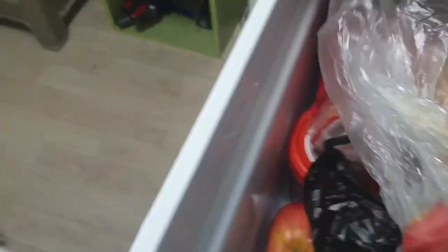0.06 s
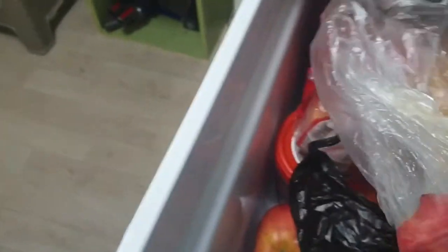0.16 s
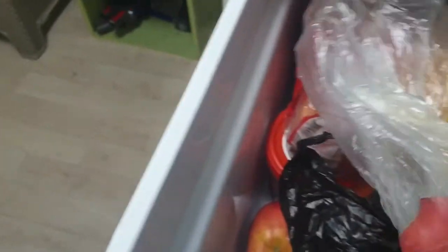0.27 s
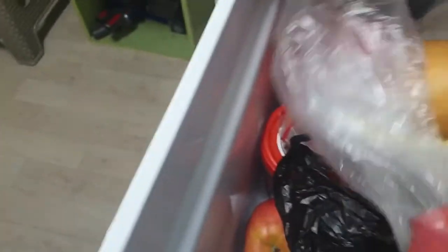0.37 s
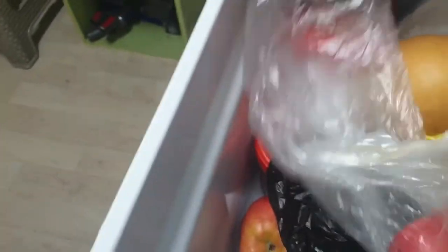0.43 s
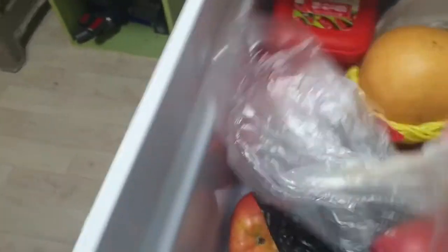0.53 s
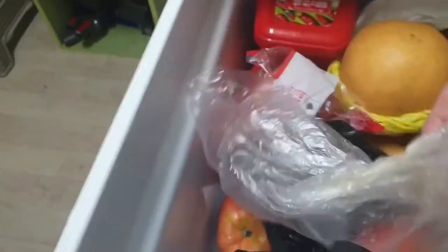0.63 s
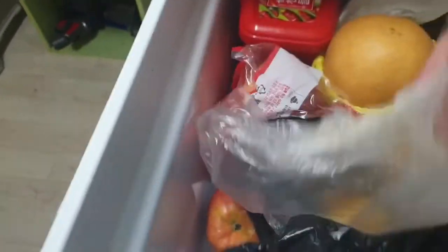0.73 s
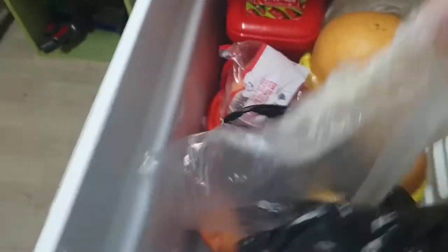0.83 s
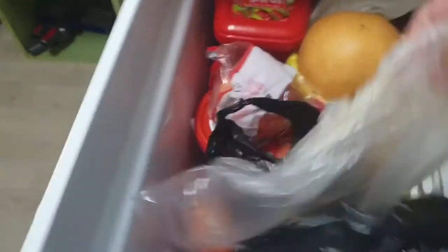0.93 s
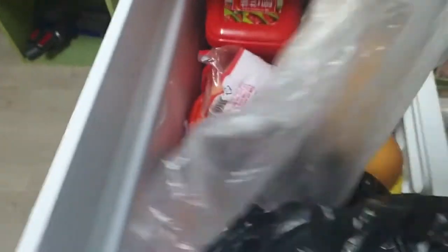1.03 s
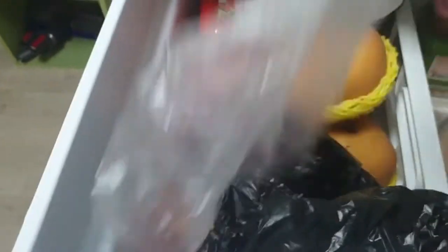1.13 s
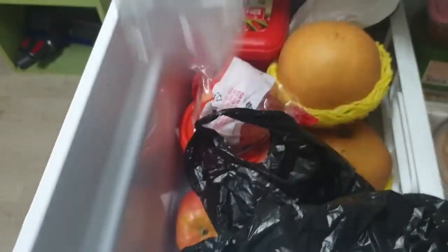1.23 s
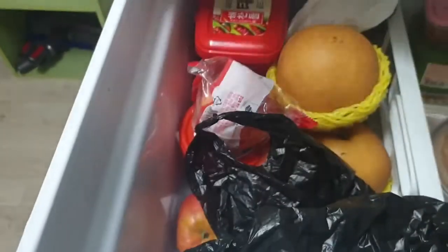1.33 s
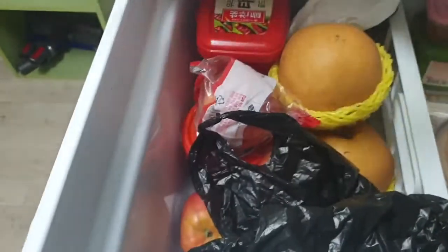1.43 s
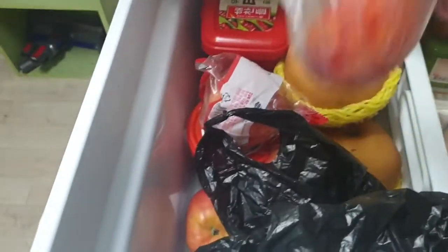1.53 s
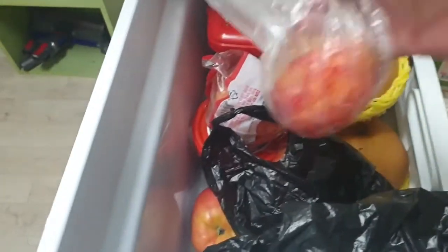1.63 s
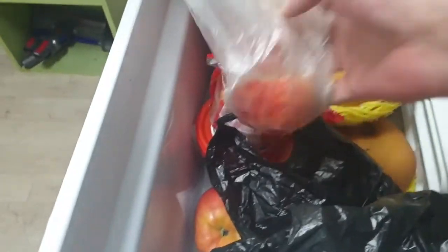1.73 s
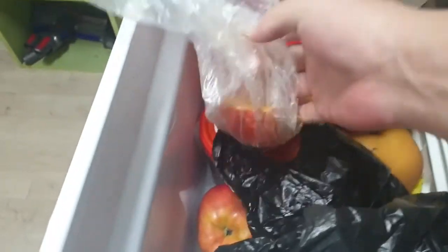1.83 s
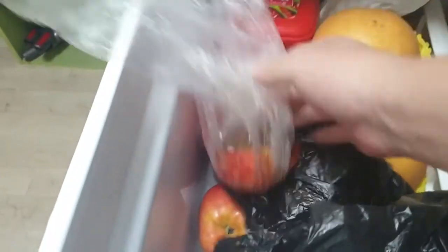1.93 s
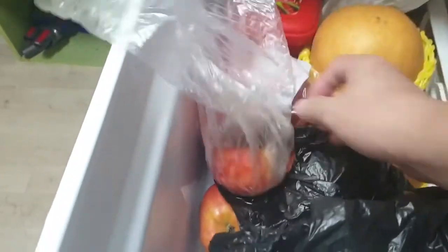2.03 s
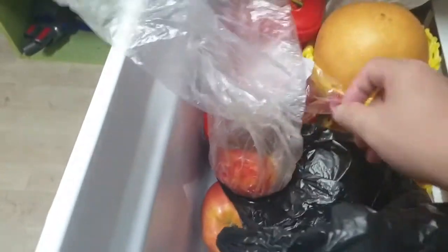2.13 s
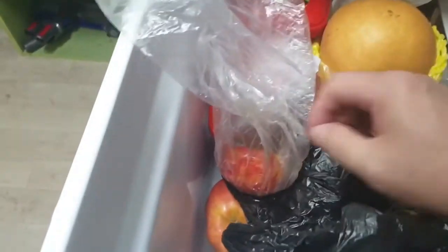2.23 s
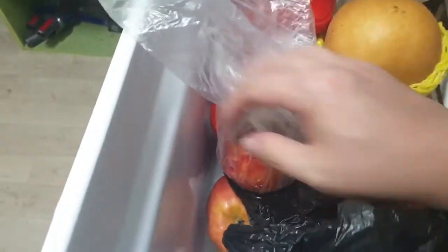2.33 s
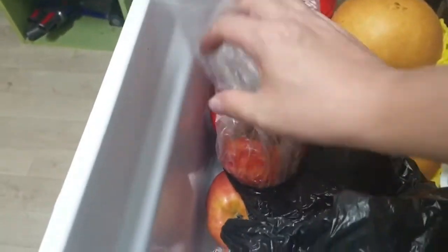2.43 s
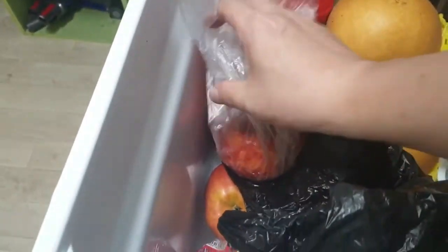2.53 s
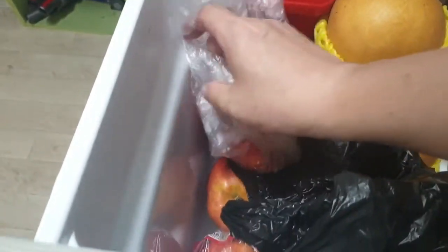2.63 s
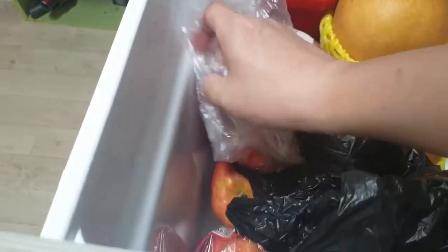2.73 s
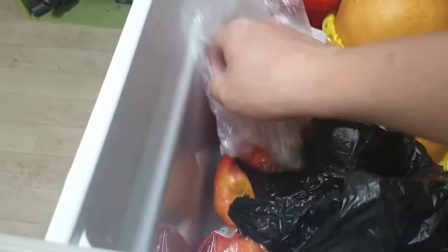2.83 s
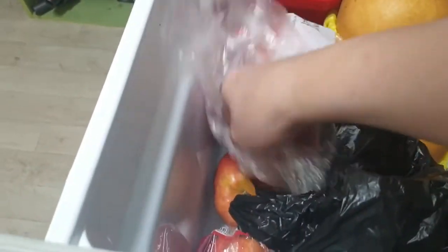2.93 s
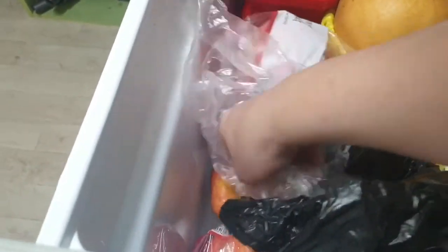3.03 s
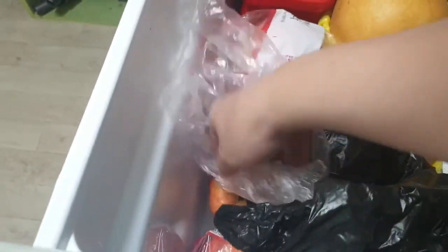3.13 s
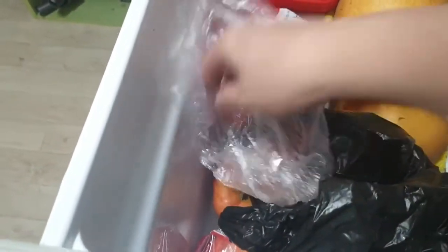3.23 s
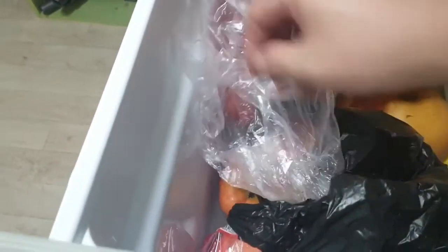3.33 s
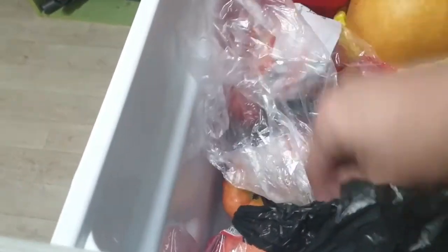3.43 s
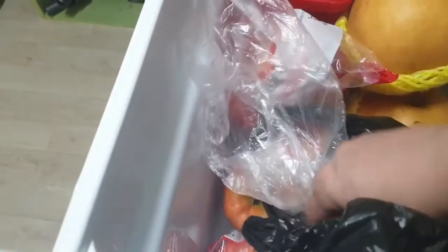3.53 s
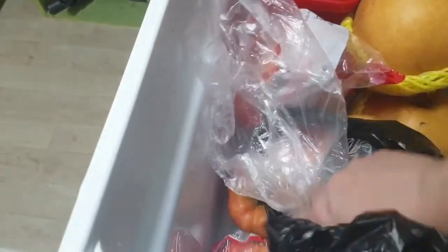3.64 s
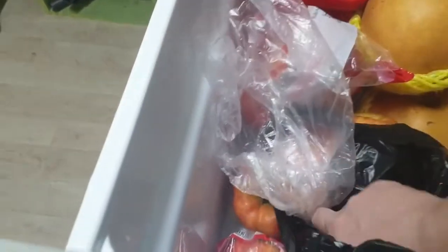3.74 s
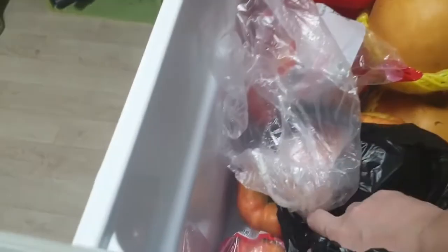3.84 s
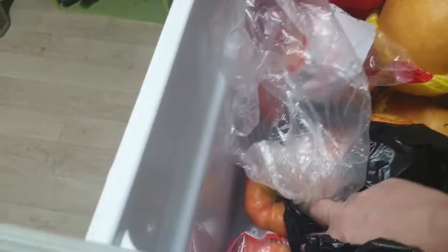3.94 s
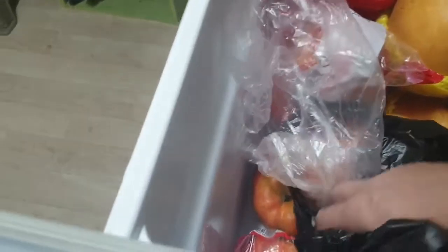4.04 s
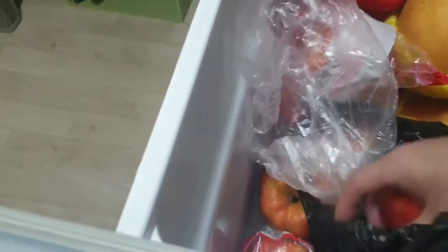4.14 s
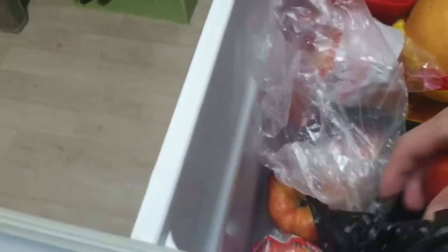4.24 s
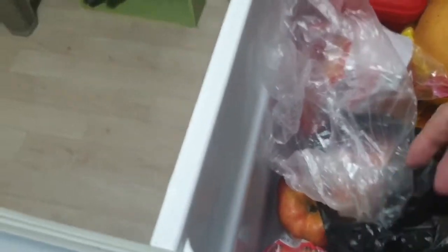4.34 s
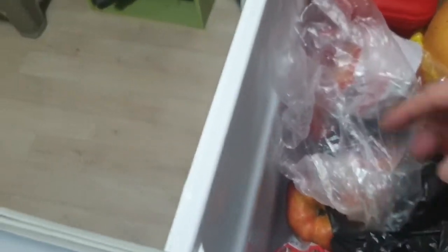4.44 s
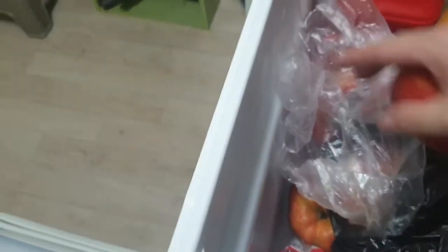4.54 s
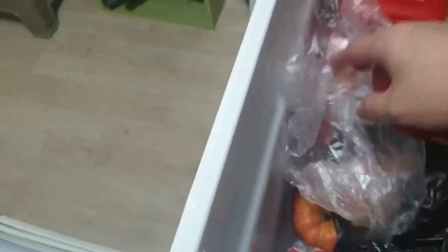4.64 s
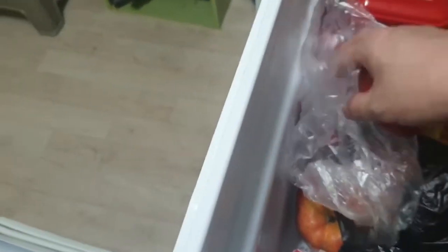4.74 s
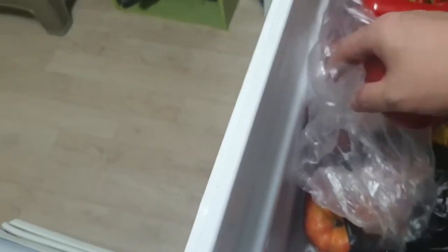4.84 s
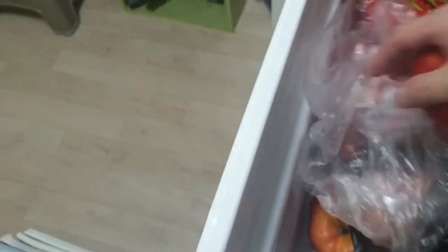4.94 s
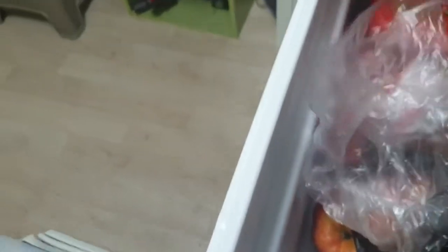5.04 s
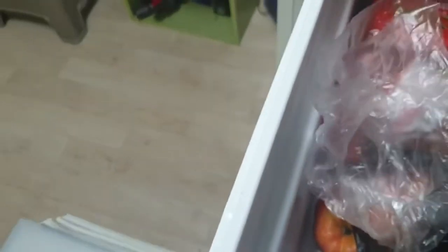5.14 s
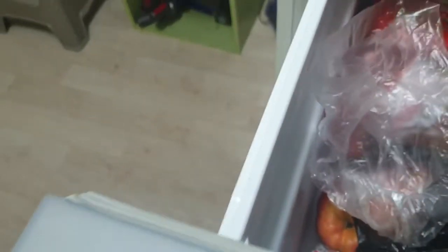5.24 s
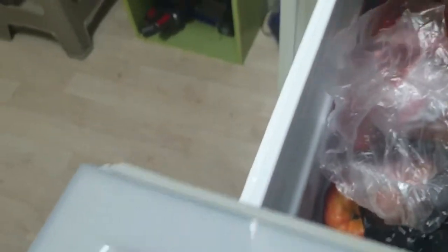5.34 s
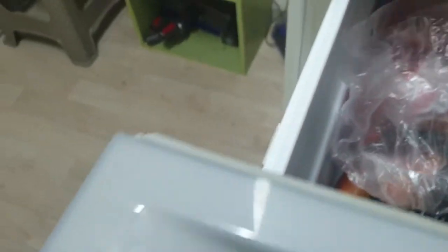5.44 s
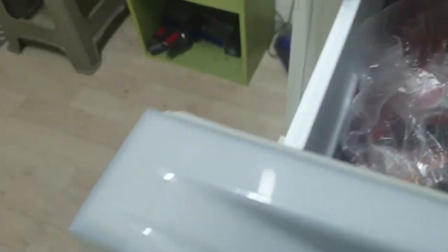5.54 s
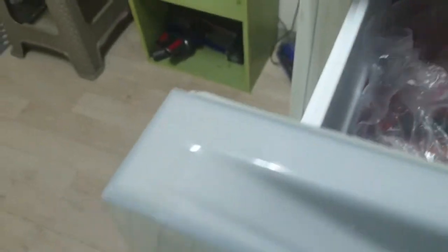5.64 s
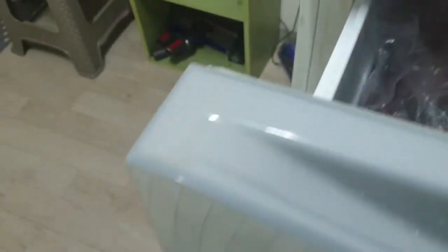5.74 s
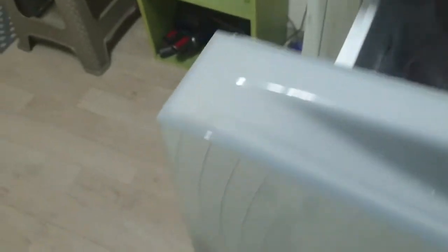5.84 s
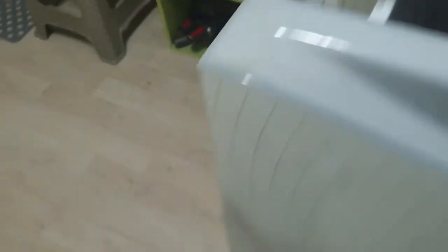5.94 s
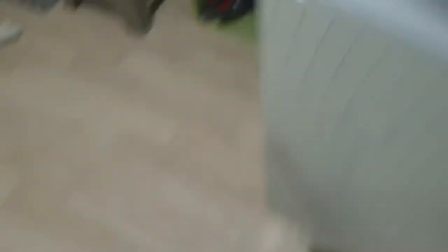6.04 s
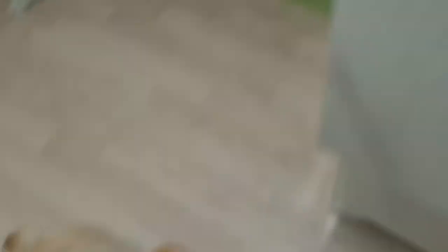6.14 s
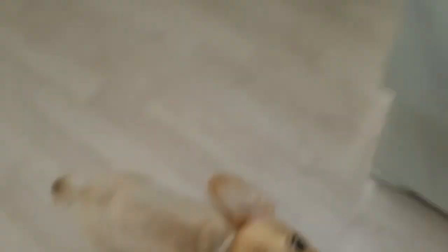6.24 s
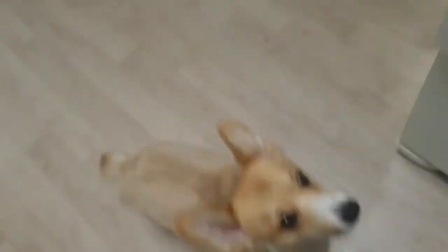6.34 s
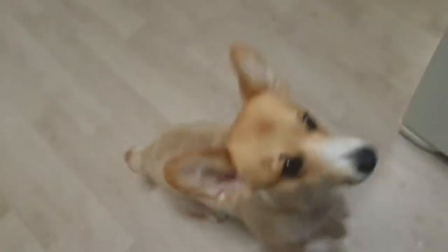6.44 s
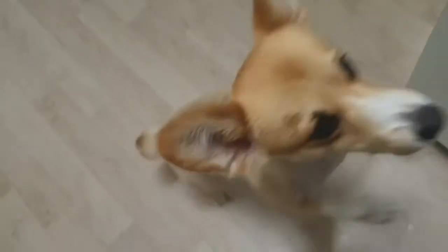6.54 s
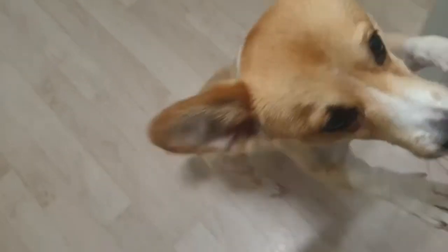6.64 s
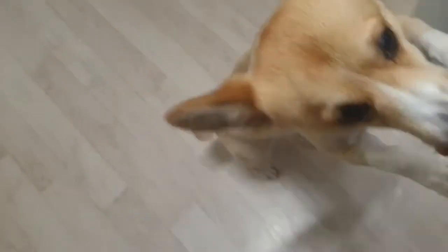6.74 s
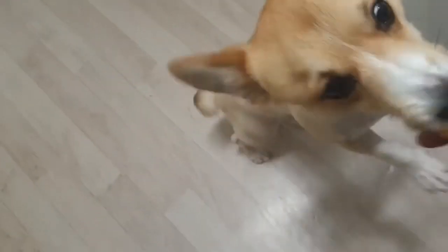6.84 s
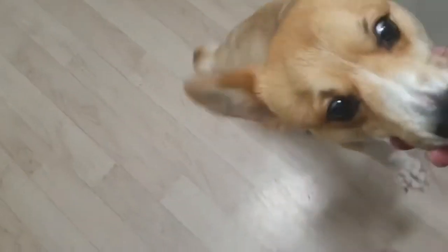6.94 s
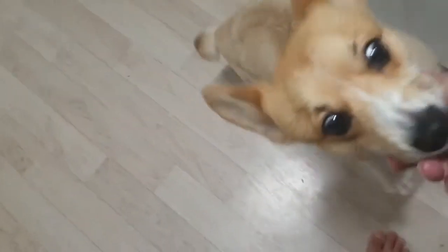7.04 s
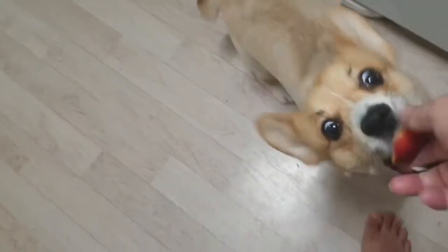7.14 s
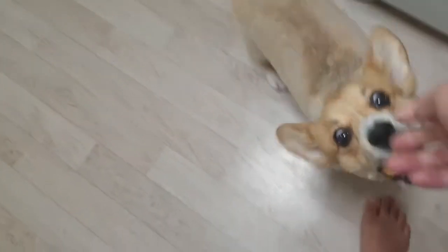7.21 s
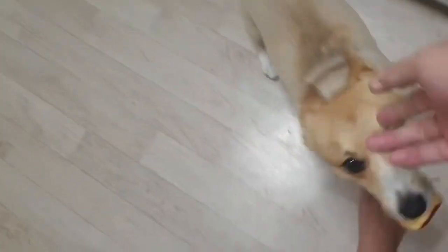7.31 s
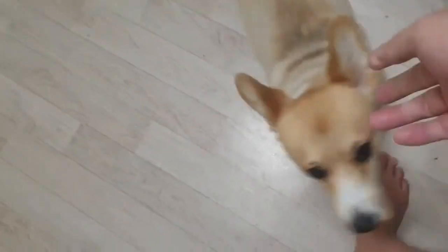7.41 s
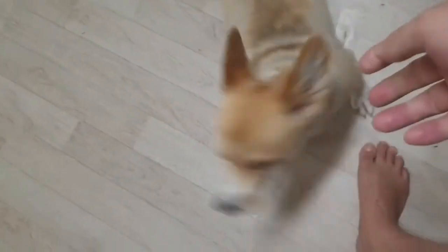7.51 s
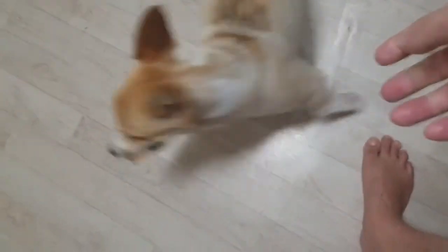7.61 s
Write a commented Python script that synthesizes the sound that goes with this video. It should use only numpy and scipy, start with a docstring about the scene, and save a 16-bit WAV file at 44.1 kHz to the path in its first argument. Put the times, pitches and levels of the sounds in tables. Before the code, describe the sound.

Close stereo sound in a small, quiet kitchen with short echoes. From 0 s thin plastic bags rustle and crinkle in uneven surges, a bright hiss of tiny folds. Soft low bumps of fruit on the hollow drawer floor come around 0.9-1.1 s, with a firmer one at 2.0 s amid sharp crease snaps. Dense, popping crackle peaks near 2.6 s and continues past 3 s, easing into lighter rustling until a near lull at 4.4 s. A very sharp crackle bursts at 4.7 s, with more snaps to about 5.4 s. The drawer starts rumbling around 5.2 s, clatters hard on its rails at 5.55-5.7 s, grinds and scrapes, then shuts at 6.5 s with a deep, ringing thump. Afterwards faint paw scuffs and claw ticks cross the hard floor, with one clear click at 7.25 s, over low room tone until about 7.7 s.

```python
"""Fruit bags in a refrigerator drawer

Close by, a hand rummages among thin plastic bags: tiny folds hiss, facets pop, single creases snap.
Fruit rings the modes of the drawer floor; the open drawer knocks, rumbles and scrapes along its rails
and shuts with a thump that rings the cabinet. A dog's paws scuff and tick on the hard kitchen floor.
Behind lie short kitchen echoes and a quiet room tone; a two-port microphone takes it all in stereo."""
import sys
import numpy as np
from scipy import signal
from scipy.fft import rfft, irfft, next_fast_len
from scipy.io import wavfile
from scipy.ndimage import uniform_filter1d

SR = 44100
rng = np.random.default_rng(int(sys.argv[2]) if len(sys.argv) > 2 else 0)


def generate_wav(signal):
    """Clip the signal to [-1, 1] and save it as 16-bit WAV at the path in sys.argv[1]."""
    frames = np.transpose(np.atleast_2d(signal))
    scaled = np.clip(frames, -1, 1) * 32767
    pcm = np.round(scaled).astype(np.int16)
    wavfile.write(sys.argv[1], SR, pcm)


N = 338247   # samples, 7.67 s

# Knocks of the open drawer on its rails:
# (time [s], crack level [dB], blow level [dB], brightness [dB per octave])
RAIL_KNOCKS = [(5.3757, -24.5, -33.5, -5), (5.556, -12.5, -20, -14), (5.5683, -19.5, -19, 7),
               (5.589, -16.5, -11.5, 0.5), (5.617, -21.5, -32, -6.5), (5.681, -19.5, -20, 2),
               (5.7687, -56, -25, 3), (5.895, -35, -41, 6), (5.9515, -36.5, -39, 4),
               (6.103, -31, -25.5, -1.5), (6.2825, -57, -34.5, 4)]
# The drawer front meets the cabinet:
# (time [s], crack level [dB], blow level [dB], brightness [dB per octave])
FRONT_BLOWS = [(6.5003, -13.5, -6, 1), (6.5138, -40.5, -21, 7.5), (6.5353, -34.5, -23, -1.5)]
# Resonances of the open drawer: (frequency [Hz], level [dB], time to fall 60 dB [s])
OPEN_DRAWER_MODES = [(84.4, -6.5, 0.4), (159.5, -1, 0.14), (183, -7, 0.18), (220, -6, 0.18),
                     (308.7, -3.5, 0.092), (501, -6.5, 0.051), (650, -12.5, 0.048)]
# Paws scuffing the floor: (loudest time [s], level [dB], swell [s], fade [s], treble [dB], thud [dB])
PAW_SCUFFS = [(6.82, -58, .1, 0.17, 11, -65), (7.055, -55, .04, .2, 18.5, -49.5),
              (6.95, -53.5, .03, 0.075, 14, -47), (7.191, -44, 0.12, 0.073, 13.5, -59),
              (7.262, -34, .02, 0.12, 1, -46), (7.43, -45, 0.07, 0.29, -3, -65)]


def bags():
    """Thin film buckles: a dense hiss of tiny folds, coarser pops, lone snaps and ticks of unfolding."""
    # Relative colour of the crackle: (frequency [Hz], level [dB per Hz])
    film_colour = [(88, -21), (150, -8), (205, -20), (249, -9), (466, -21.5), (805, -13.5), (1240, -16),
                   (1360, -16), (1700, -12.5), (2400, -15), (6260, -10.5), (9630, -15), (14500, -16),
                   (16000, -5)]
    # Grips and pulls: (loudest time [s], level [dB], swell [s], fade [s],
    # fullness of the low crackle [dB], share of coarse pops [0-1])
    grips = [(0.0, -32, .1, 0.096, -8.5, 0), (0.15, -36, 0.12, 0.22, -10, 0.03),
             (0.37, -35, 0.059, 0.37, -3.5, 0), (0.49, -29, 0.056, 0.12, -3, 0),
             (0.62, -28, 0.063, 0.067, -3, 0.01), (0.76, -25.5, .2, 0.46, -6.5, 0),
             (0.92, -29, 0.9, 0.13, -4, 0.06), (1.04, -25.5, 0.084, 0.26, -3.5, 0.06),
             (1.25, -34.5, 0.2, 1, -7.5, 0.04), (1.58, -25, 0.16, 0.085, -9, .08),
             (1.8, -34, 0.11, 0.48, -10.5, 0.16), (2.03, -23.5, 0.054, 0.085, 3, 0),
             (2.12, -28.5, 0.24, 0.052, -4.5, 0.1), (2.22, -40.5, 0.24, 0.14, -1, 0.02),
             (2.32, -38, 0.036, 0.05, -1, 0.04), (2.4, -36, 0.04, 0.26, -4, 0),
             (2.5, -30, 0.078, 0.53, -7.5, 0.01), (2.597, -19, 0.029, 0.2, 1.5, 0.23),
             (2.825, -27.5, 0.063, 0.16, -1, 0.32), (2.93, -24, 0.087, 0.24, -0.5, 0.07),
             (3.055, -26.5, 0.067, 0.11, -3, 0.4), (3.2, -35, .15, 0.22, -9, 0.17),
             (3.285, -34.5, 0.36, 0.11, 0, 0.04), (3.46, -35, 0.0037, 0.012, 0, 0),
             (3.53, -35, 0.03, 0.18, -1.5, 0), (3.62, -33, 0.082, 0.19, 2.5, 0.02),
             (3.76, -26.5, 0.18, 0.23, -1, 0.03), (4.01, -30.5, 0.18, 0.2, -1, 0.1),
             (4.19, -32, 0.2, 0.21, -4.5, .05), (4.3, -36, 0.11, 0.16, -1, 0),
             (4.4, -52.5, .06, 0.19, -11.5, 0.24), (4.702, -18.5, 0.027, 0.13, -4.5, 0.33),
             (4.9, -24.5, 0.2, 0.19, -12, 0.56), (5.02, -34, .15, .09, 2.5, 0.6),
             (5.12, -40.5, 0.032, 0.098, 9, 0.54)]
    # Where the hand is: (time [s], left over right [dB])
    hand_side = [(0, -2), (.5, -1), (1.0, 0), (1.6, 1), (2.2, -1), (2.798, -.5), (3.5, -1), (4.4, -2.5),
                 (5.2, -1)]
    # Single creases snapping: (time [s], level [dB], centre [Hz], left over right [dB])
    snaps = [(0.3317, -20, 12400, 2), (1.0088, -12, 6350, -7), (1.059, -25, 1720, 3),
             (2.0292, -11, 1670, 1), (2.0734, -10.5, 2650, -2), (2.1122, -9, 1540, 2),
             (2.2504, -23, 5670, -7), (2.291, -22, 5090, 4), (2.3833, -30, 8600, -20),
             (2.584, -8, 2120, -6), (2.779, -18, 5000, -1), (2.8978, -19, 6410, 8), (2.92, -17, 5570, 15),
             (3.0999, -17, 3500, 10), (3.1208, -14.5, 4560, 0), (3.1565, -16.5, 1600, 0),
             (3.1967, -15.5, 1670, 5), (3.3009, -13.5, 2120, 3), (3.4576, -30.5, 2470, -2),
             (3.5109, -31, 7960, -6), (3.524, -30, 6600, -4.5), (4.3505, -31, 10900, -3.5),
             (4.442, -35, 6280, 4), (4.6396, -39, 11700, -18), (4.6734, -23, 8900, -8),
             (4.6852, -14, 2320, 4), (4.7093, -3, 3120, -1), (4.8252, -33, 4350, -6),
             (4.844, -26, 5100, -8), (4.8762, -9.5, 5000, 2), (4.8928, -10, 3630, -6),
             (4.9817, -17, 3400, -2), (5.016, -8, 5800, 3), (5.0923, -18.5, 3800, 0),
             (5.1097, -27, 4900, 0), (5.1205, -12, 5740, 0), (5.1519, -18, 2400, -2),
             (5.2053, -18, 1700, -4), (5.25, -25, 4900, 0), (5.2952, -15.5, 5800, 0),
             (5.3753, -8, 11100, -6)]

    level, full_db, coarse = swells(grips)
    coarse = np.clip(coarse, 0, 1)
    (pan_db,) = in_time(hand_side)
    folds = creases(500, spread_db=4.0, last_s=.002)
    graininess = np.sqrt(1.3 + 0.4 * folds ** 2)
    hiss = banded(film_colour, 2.17, 10.0, graininess, full_db, 2700)
    pops = buckles(2600, 3.1, 2.2, full_db)
    film = np.sqrt(1 - coarse) * hiss + np.sqrt(coarse) * pops

    # A released bag ticks faintly as it unfolds
    unfold_times = np.linspace(4.41, 4.61, 8)
    luck = rng.normal(0, 1, (8, 3))
    unfolding = [(s + 0.0074 * a, -39 + 3 * b, 8000 * 0.69 ** c, hand_side[-2][1])
                 for s, (a, b, c) in zip(unfold_times, luck)]
    sharp = ticks(lasting(snaps + unfolding, 0.044), 0.92, 0.052, spike_db=6.0)
    return level * sides(pan_db) * film + sharp


def buckles(per_s, spread_db, cycles, full_db):
    """Small facets of film pop through and ring a few cycles, each size from a spot of its own; rms 1."""
    born = rng.random(N) < per_s * from_db(3.0 * drift(40)) / SR
    sizes = from_db(spread_db * np.minimum(rng.exponential(1, N), 4))
    pushes = born * sizes * rng.choice([-1, 1], N)
    pitches = np.geomspace(950, 7000, 14)
    dealt = rng.integers(0, 14, N)   # which pitch a pop at this sample gets
    spots = rng.normal(0, 1, (14, 2))
    out = 0
    for k, hz in enumerate(pitches):
        gain = from_db(full_db / (1 + (hz / 3000) ** 2) - 0.47 * np.log2(hz / 3000))
        pops = ring(pushes * gain * (dealt == k), hz, cycles / hz)
        out = out + placed(pops, 1.0 * spots[k, 0], 0.00025 * spots[k, 1])
    return rms_one(out)


def fruit():
    """Bumps ring the drawer floor until the weight of the bag settles on it and damps the ring."""
    # Landings: (time [s], level [dB], brightness [dB per octave], time until damping starts [s])
    landings = [(0.848, -26.5, 2.5, 0.087), (0.88, -38, 3, .13), (1.06, -21, -2, .2), (1.095, -42, -2, .2),
                (1.135, -18, -1, 0.25), (1.562, -40, 8, 0.05), (2.026, -12, -3, .04),
                (2.047, -24, -4, 0.0138), (2.695, -25, -2.5, 0.097), (2.71, -36, 20, .12),
                (3.068, -43, -4, 0.15), (3.219, -42, 13.5, 0.15), (3.624, -31, -6.5, .15),
                (3.745, -39, 1, .2), (4.692, -37, 2, .1), (4.718, -37, 23, .08)]
    # Resonances of the drawer floor: (frequency [Hz], level [dB], time to fall 60 dB [s])
    floor_modes = [(60.6, -18, 0.28), (72.6, -10.5, 0.8), (147.5, -4.5, 0.094), (208.4, -4, 0.078),
                   (255, -12.5, 0.11), (314, -7, 0.035)]
    damping_db_per_s = 97

    s, level_db, bright_db, free_s = np.transpose(landings)
    t = np.arange(N) / SR
    last = np.maximum(np.searchsorted(s, t) - 1, 0)   # the latest landing
    loaded_s = np.maximum(t - s[last] - free_s[last], 0)
    damped = uniform_filter1d(from_db(-damping_db_per_s * loaded_s), size=128)
    body = struck(list(zip(s, level_db, bright_db)), floor_modes, 0.95, -34.5, 0.059)
    return placed(damped * body * from_db(-2), -0.36, .0001)


def drawer():
    """Blows on the rails ring the open drawer; the closing blows ring the cabinet."""
    # Resonances of the cabinet: (frequency [Hz], level [dB], time to fall 60 dB [s])
    cabinet = [(54.3, 9, 0.1), (73.6, -12.5, 0.53), (163, -5.5, 0.44), (171.7, -23.5, 0.12),
               (199, -10.5, 0.44), (298, -7, 0.16), (376, -14.5, 0.14), (463, -4.5, 0.093), (682, -10, .12),
               (828, -19.5, .1)]
    on_rails = knocks(RAIL_KNOCKS, OPEN_DRAWER_MODES, 0.07, -2.03)
    return on_rails + knocks(FRONT_BLOWS, cabinet, 0.1, -1.2)


def knocks(events, modes, crack_t60, thud_db):
    """Blows into a hollow body, each with a dull thud of the contents and a bright crack."""
    blows = [(s, db - 4.0, bright_db) for s, crack_db, db, bright_db in events]
    body = struck(blows, modes, 1.0, -40.0, 0.071)   # little in the drawer is loose
    thud_rows = [(s, db + thud_db, 600, .25, -1.5) for s, crack_db, db, bright_db in events]
    crack_rows = [(s, crack_db, 4000, crack_t60, -2.0) for s, crack_db, db, bright_db in events]
    thuds = ticks(thud_rows, 0.57, 0.98, 2.4)
    cracks = ticks(crack_rows, 1.2, 0.13, 3.0)
    return placed(body, -0.86, 0.00027) + thuds + cracks


def rolling():
    """Rollers on rough rails shake the drawer's modes and rumble; blows and paws add a dying shudder."""
    # The drawer on the move: (time [s], rumble [dB], grinding [dB])
    travel = [(4.9, -55, 14), (5.15, -41, -5), (5.28, -34.5, -17.5), (5.4, -32, -3), (5.54, -30.5, -15),
              (5.75, -22, -10.5), (5.85, -36, -17), (5.95, -26.5, -13.5), (6.06, -34.5, -15),
              (6.24, -35, -12), (6.48, -40.5, -5.5), (6.7, -54, -8.5), (7.67, -66.5, -6.5)]
    # Relative colour of the rumble: (frequency [Hz], level [dB per Hz])
    rumble_colour = [(18, -49), (30, -49), (71, -11.5), (90, -4.5), (114, -20.5), (166, -6.5), (372, -6.5),
                     (498, -9.5), (533, -17), (666, -9.5), (1040, -12), (1800, -15.5), (2340, -77.5),
                     (3960, -120)]

    rumble_db, grind_db = in_time(travel)
    # Shudder levels stand relative to the blow; fades are times to lose 20 dB
    after_knocks = [(s, db + 0.5, .004, 0.068) for s, crack_db, db, bright_db in RAIL_KNOCKS]
    after_shut = [(s, db - 8.5, .004, 0.19) for s, crack_db, db, bright_db in FRONT_BLOWS]
    paw_thuds = [(s, thud_db, swell, fade) for s, db, swell, fade, treble_db, thud_db in PAW_SCUFFS]
    shudder, = swells(after_knocks + after_shut + paw_thuds, bend=0.85)

    roughness = np.sqrt(0.17 + 1.4 * creases(150, 1.3, 0.0015) ** 2)
    jolts = rng.standard_normal(N) * roughness
    shaken = sum(from_db(db) * ring(jolts, hz, 0.45 * t60) for hz, db, t60 in OPEN_DRAWER_MODES)
    # Grinding lifts the upper rumble
    grind = from_db(grind_db - 3.5) * banded(rumble_colour, 1.7, 14, 1, -grind_db, 440)
    rumble = from_db(-3.5) * placed(rms_one(shaken), -0.72, 0.00039) + grind
    moving = np.arange(N) > travel[0][0] * SR
    return np.hypot(moving * from_db(rumble_db), shudder) * rumble


def sliding():
    """Surfaces rub with a grainy hiss: a rasp after each drawer crack, rail scrapes and paw scuffs."""
    # The drawer scraping its rails: (loudest time [s], level [dB], swell [s], fade [s], treble [dB])
    scrapes = [(5.215, -40.5, .03, 0.1, -2), (5.305, -51, .03, 0.067, 6), (5.72, -37.5, .3, 0.078, 1),
               (5.915, -39, .03, 0.11, -3.5), (6.025, -45, .015, 0.044, -8), (6.4, -46.5, .22, 0.17, -1.5)]
    # Relative colour of the rubbing: (frequency [Hz], level [dB per Hz])
    rub_colour = [(410, -69), (700, -18), (1500, -28.5), (1840, -6), (3690, -4.5), (4920, -2.5),
                  (9860, -23.5), (13700, 3.5), (15400, -20), (16000, -39)]

    rasps = [(s, crack_db - 14, .004, 0.14, -2)
             for s, crack_db, db, bright_db in RAIL_KNOCKS + FRONT_BLOWS]
    scuffs = [row[:5] for row in PAW_SCUFFS]
    level, treble_db = swells(rasps + scrapes + scuffs, bend=0.98)
    graininess = np.sqrt(0.37 + 0.32 * creases(140, 4.9, 0.0025) ** 2)
    hiss = banded(rub_colour, 1.8, 8.1, graininess, -treble_db, 8000)
    return level * from_db(treble_db) * hiss


def claws():
    """Claws and other small contacts on the hard floor: narrow bands of noise with a sharp onset."""
    # Ticks: (time [s], level [dB], centre [Hz], left over right [dB])
    claw_ticks = [(5.908, -27, 2920, -3), (6.0175, -43, 2000, -8), (6.1642, -27.5, 4200, 0),
                  (6.2664, -29.5, 1480, 3), (6.32, -36, 1500, -7), (6.3726, -34, 3470, -1),
                  (6.7324, -39, 3630, 1), (6.8053, -34.5, 3440, 1), (6.836, -34, 4740, -2),
                  (6.9455, -28.5, 5660, -5), (6.993, -35.5, 3660, 0), (7.0648, -37, 5940, -5),
                  (7.1676, -36, 3400, -5), (7.2508, -10.5, 2700, -1), (7.2544, -12.5, 4800, 0),
                  (7.2644, -32, 4940, 3), (7.414, -26.5, 3380, 0), (7.4663, -24.5, 2820, -2),
                  (7.6126, -39.5, 4100, 5)]
    return ticks(lasting(claw_ticks, 0.14), .35, 0.16, spike_db=5.0, order=2)


def kitchen(x):
    """Walls send sound back: four feedback delays a side, duller on every round, block by block."""
    t60_s, wall_cut_hz = 0.2, 7500
    out = np.zeros((2, N))
    dull = np.exp(-2 * np.pi * wall_cut_hz / SR)
    lags = (rng.uniform(0.0083, 0.051, size=8) * SR).astype(int)
    for k, lag in enumerate(lags):
        loop, state = x.copy(), [0.]
        gain = from_db(-60 * lag / SR / t60_s)
        for i in range(lag, N, lag):
            back, state = signal.lfilter([gain * (1 - dull)], [1, -dull], loop[i - lag:i], zi=state)
            loop[i:i + lag] += back[:N - i]
        out[k % 2] += (loop - x) * (-1) ** (k // 2)
    return out


def room_tone():
    """The quiet kitchen: steady coloured noise that flickers a little in every band."""
    # Relative colour of the room tone: (frequency [Hz], level [dB per Hz])
    quiet_colour = [(15, -35), (25, 24.5), (64, 18.5), (212, -2), (591, -3.5), (659, -5), (1840, -7),
                    (4610, -8), (8830, -11.5), (14800, -9), (16000, -30)]
    return from_db(-64) * banded(quiet_colour, 0.94, 2.9)


def from_db(db):
    """dB to gain."""
    return 10 ** (np.asarray(db) / 20)


def rms_one(x):
    """Scale to rms 1."""
    return x / np.sqrt(np.mean(x ** 2) + 1e-20)


def in_time(rows):
    """Columns of a curve table, one value a sample."""
    s, *columns = np.transpose(rows)
    return [np.interp(np.arange(N) / SR, s, c) for c in columns]


def at_hz(points, hz):
    """Read a spectrum on a log frequency axis."""
    table_hz, value = np.transpose(points)
    return np.interp(np.log(hz), np.log(table_hz), value)


def drift(rate):
    """Slow chance of spread 1: noise at every 40th sample through a double one-pole low-pass."""
    r = np.exp(-80 * np.pi * rate / SR)
    noise = rng.standard_normal(N // 40 + 2002)
    slow = signal.lfilter([1], [1, -2 * r, r * r], noise)[2000:]   # skip the filter's start
    return np.interp(np.arange(N) / 40, np.arange(len(slow)), rms_one(slow))


def sides(pan_db):
    """Left and right gains; positive is louder at the left."""
    return from_db(np.array([pan_db, -pan_db]) / 2)


def placed(x, pan_db, lag_s):
    """A source to one side: pan_db is left over right, lag_s how much later it arrives at the left."""
    late = np.interp(np.arange(N) - lag_s * SR, np.arange(N), x)
    return np.array([late, x]) * sides(pan_db)[:, None]


def swells(events, bend=1.5):
    """Each row swells and fades (times to cover 20 dB); powers add, further columns follow the loudest.

    A bend of 1 gives pointed tops, 2 rounded ones."""
    t = np.arange(0, N + 32, 32) / SR
    s, level_db, swell, fade, *traits = np.transpose(events)[:, :, None]
    before = (s - t) / np.maximum(swell, .002)
    after = (t - s) / np.maximum(fade, .01)
    away = np.where(t < s, before, after)
    power = from_db(2 * np.maximum(level_db - 20 * away ** bend, -140))
    total = power.sum(axis=0)
    rows = [np.sqrt(total)] + [(power * c).sum(axis=0) / total for c in traits]
    return [np.interp(np.arange(N) / SR, t, r) for r in rows]


def banded(spectrum, patchy_db, flicker_hz, shape=1, low_db=0, knee_hz=2200):
    """Half-octave bands of stereo noise under a common shape; bands below the knee also follow low_db."""
    # How alike the left and right noise are: (frequency [Hz], likeness [-1 to 1])
    likeness = [(60, 0.88), (180, 0.95), (550, 0.94), (1650, 0.091), (4970, -0.1), (15000, 0.0021)]
    out = 0
    edges = 25 * 2 ** np.arange(0, 9.6, .5)
    white = rng.standard_normal((2, 2, N)) * shape   # neighbouring bands take turns
    for k, (low, high) in enumerate(zip(edges, edges[1:])):
        hz = np.sqrt(low * high)
        if not spectrum[0][0] / 2 < hz < spectrum[-1][0] * 2:
            continue
        band = signal.butter(2, [low, high], "band", fs=SR, output="sos")
        mid, side = signal.sosfilt(band, white[k % 2])
        alike = np.clip(at_hz(likeness, hz), -1, 1)
        pair = np.sqrt(1 + alike) * mid + np.sqrt(1 - alike) * side * [[1], [-1]]
        gain = from_db(at_hz(spectrum, hz) + patchy_db * drift(flicker_hz))
        low_gain = from_db(low_db / (1 + (hz / knee_hz) ** 2))
        out = out + gain * low_gain * pair
    return rms_one(out)


def creases(per_s, spread_db, last_s):
    """Envelope of random bunched little jolts: sudden, then dying in a few ms; rms 1."""
    born = rng.random(N) < per_s * from_db(3.0 * drift(25)) / SR
    sizes = from_db(spread_db * np.minimum(rng.exponential(1, N), 4))
    return rms_one(signal.lfilter([1], [1, -np.exp(-1 / (last_s * SR))], born * sizes))


def ring(force, hz, t60):
    """A unit click sets a sine of height 1 ringing."""
    r = from_db(-60 / (max(t60, .01) * SR))
    w = 2 * np.pi * hz / SR
    return signal.lfilter([0, np.sin(w)], [1, -2 * r * np.cos(w), r * r], force + 1e-18)


def struck(events, modes, spread_db, rattle_db, rattle_s):
    """Contacts ring every mode, brighter ones the high modes more; loose parts rattle on and blur it."""
    s, level_db, bright_db = np.transpose(events)
    out = np.zeros(N)
    vary = rng.normal(0, 1, (len(s), len(modes)))
    jitter = from_db(rattle_db) * rng.standard_normal(N)
    keep = np.exp(-1 / (rattle_s * SR))
    for k, (hz, mode_db, t60) in enumerate(modes):
        tilt_db = bright_db * np.log2(hz / 150)
        clicks = np.full(N, 1e-18)
        clicks[(s * SR).astype(int)] = from_db(level_db + mode_db + tilt_db + spread_db * vary[:, k])
        force = clicks + jitter * signal.lfilter([1], [1, -keep], clicks)
        out += (-1) ** k * ring(force, hz, t60)
    return out


def lasting(events, t60):
    """Give every tick the same ring time."""
    return [(s, level_db, hz, t60, pan_db) for s, level_db, hz, pan_db in events]


def ticks(events, octaves, alike, spike_db, order=1):
    """A sharp spike, then a dying puff of noise, through a band this many octaves either side."""
    size, spike_s = 9000, .0008
    out = np.zeros((2, N))
    noise = rng.standard_normal((len(events), 2, size))
    t = np.arange(size) / SR
    for (s, level_db, hz, t60, pan_db), (mid, side) in zip(events, noise):
        edges = np.clip([hz / 2 ** octaves, hz * 2 ** octaves], 50, .45 * SR)
        band = signal.butter(order, edges, "band", fs=SR, output="sos")
        fade = from_db(-60 * t / max(t60, .003)) + from_db(spike_db) * np.exp(-t / spike_s)
        pair = mid * np.sqrt(1 + alike) + side * np.sqrt(1 - alike) * [[1], [-1]]
        puff = signal.sosfilt(band, pair * fade)
        passed = np.sqrt((edges[1] - edges[0]) / (SR / 2))   # share of the noise the band lets through
        gains = from_db(level_db - 21) / passed * sides(pan_db)[:, None]
        at = int(s * SR)
        out[:, at:at + size] += (gains * puff)[:, :N - at]
    return out


def scene():
    """Bags, fruit, blows and claws with the kitchen's answer; rolling, rubbing and room tone without."""
    near = bags() + fruit() + drawer() + claws()
    echoes = from_db(-19.0) * kitchen(near.mean(axis=0))
    return near + echoes + rolling() + sliding() + room_tone()


def record(dry):
    """The two ports differ in colour, the small capsules lose the deepest bass, the top is cut steeply."""
    # Microphone ports: (frequency [Hz], left over right [dB])
    port_tilt = [(60, -2), (150, 0.5), (380, -0.5), (950, 1), (2380, 1), (5980, 1), (15000, -3)]
    size = next_fast_len(N)
    hz = np.maximum(np.arange(size // 2 + 1) * SR / size, 10)
    tilt_db = at_hz(port_tilt, hz)
    ports = irfft(rfft(dry, size) * sides(tilt_db), size)[:, :N]
    capsule = signal.sosfilt(signal.butter(2, 50, "high", fs=SR, output="sos"), ports)
    return signal.sosfilt(signal.cheby2(18, 90, 16300, fs=SR, output="sos"), capsule)


dry = scene()
out = record(dry)
generate_wav(out)
```